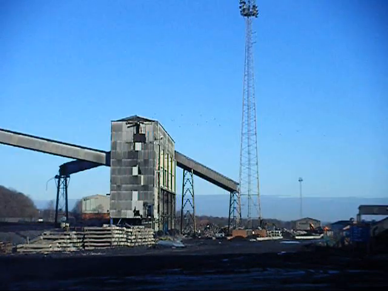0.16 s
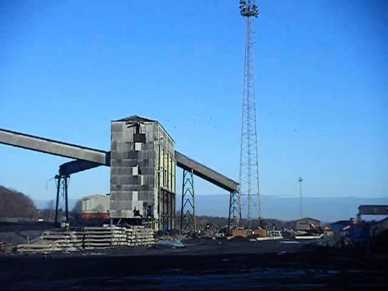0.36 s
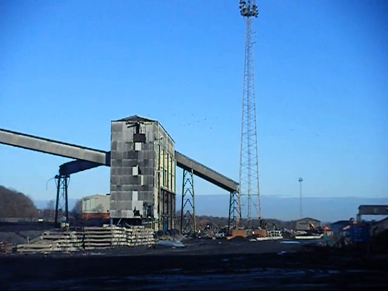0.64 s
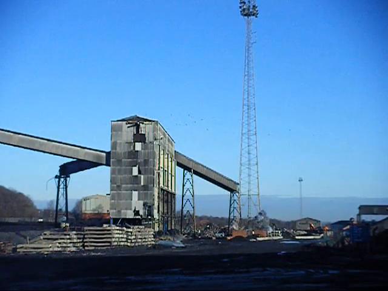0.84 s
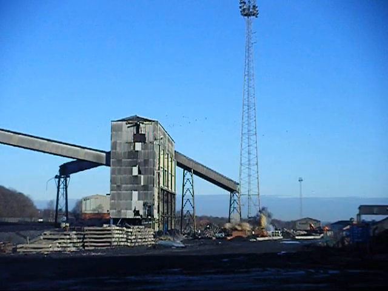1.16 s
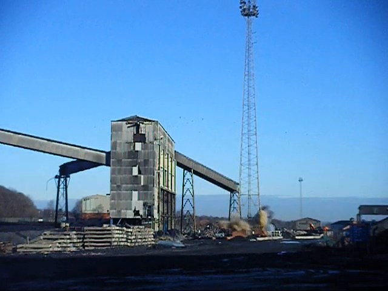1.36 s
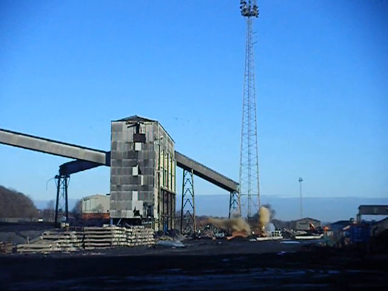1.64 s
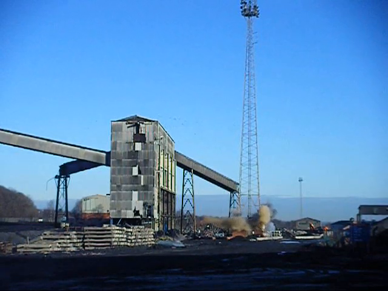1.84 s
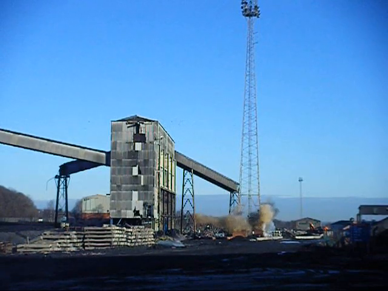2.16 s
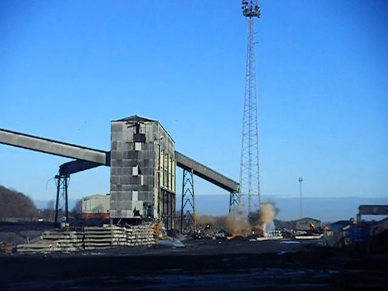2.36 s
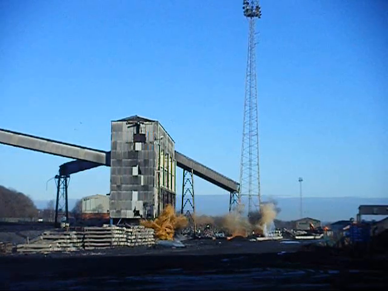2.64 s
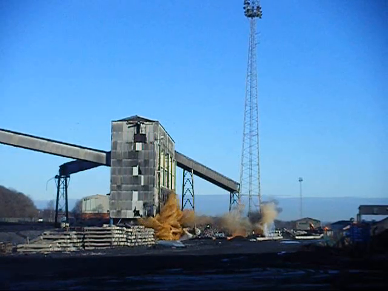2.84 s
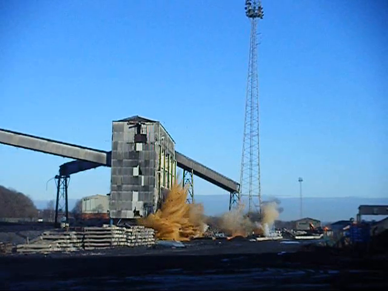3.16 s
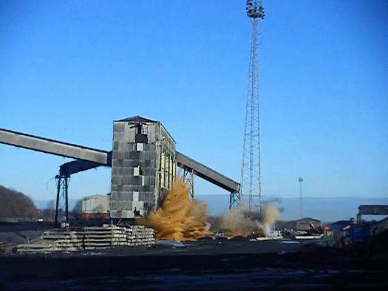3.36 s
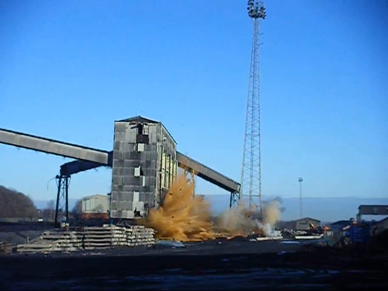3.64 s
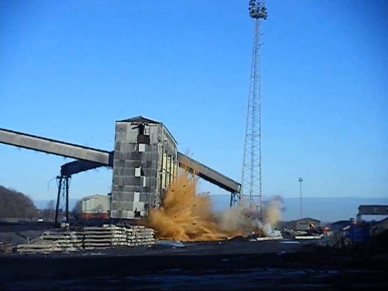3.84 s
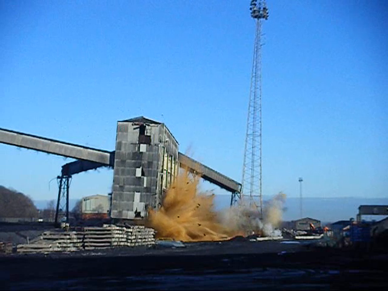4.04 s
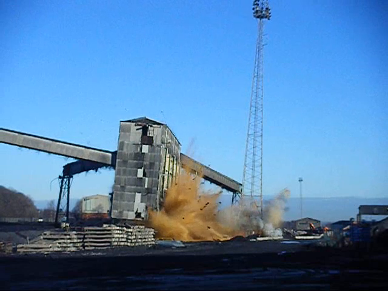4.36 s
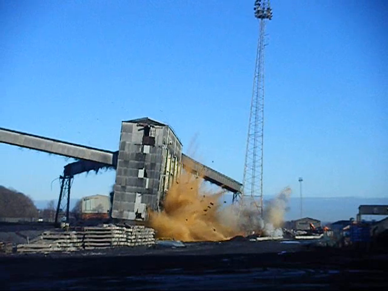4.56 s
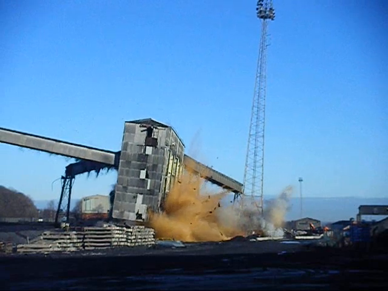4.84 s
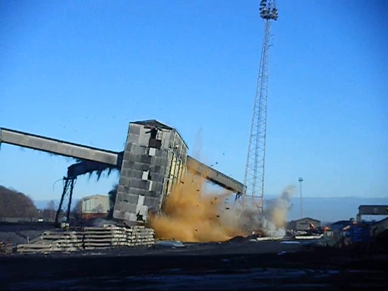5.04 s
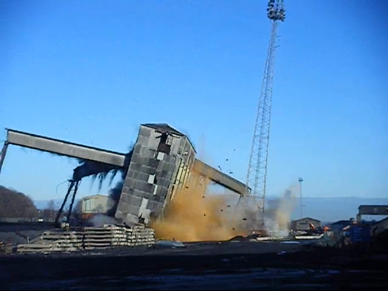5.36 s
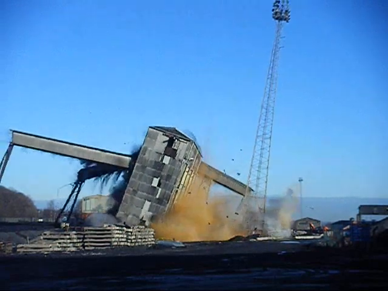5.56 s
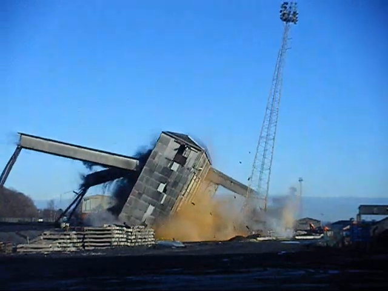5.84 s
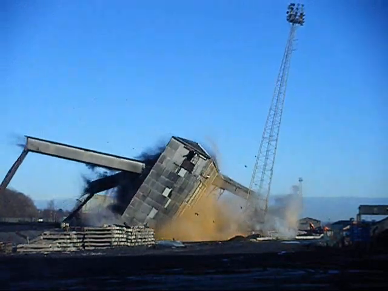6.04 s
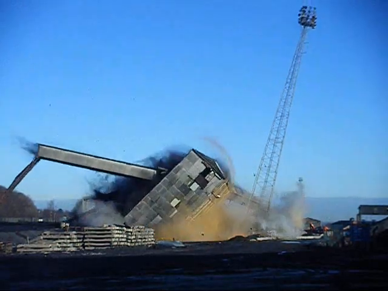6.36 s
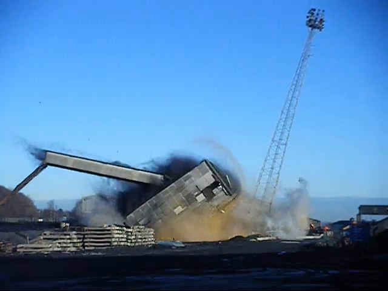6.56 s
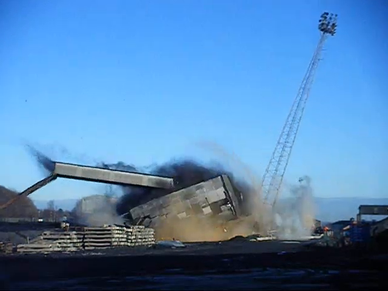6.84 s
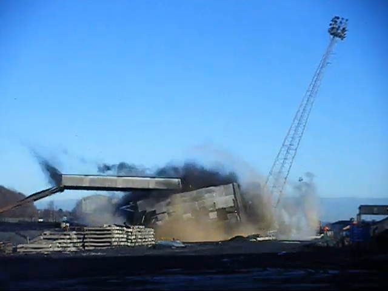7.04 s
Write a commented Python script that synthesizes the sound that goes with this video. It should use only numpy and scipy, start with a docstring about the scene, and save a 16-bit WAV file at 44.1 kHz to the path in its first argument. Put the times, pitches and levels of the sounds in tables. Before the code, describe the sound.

Distorted explosive blasts with dense rumbling echoes, followed by a heavy collapse of steel and rubble, thuds and clattering metal sheets outdoors.

```python
"""Demolition charges cut the legs of a steel tower on an open industrial site, heard in mono from one place.
Each blast is a pressure jump with a booming suction phase, a steep front and a short burst of tearing noise.
Echoes are dense random impacts coloured in four bands; the fall adds poured debris, thuds, ringing
girders, ticking splinters and clattering sheets over faint outdoor air.
The small camera microphone overloads on the blasts; coarse, stepped sampling adds a gritty treble."""
import sys
import numpy as np
from scipy import signal
from scipy.fft import rfft, irfft, next_fast_len
from scipy.io import wavfile

SR = 44100
rng = np.random.default_rng(int(sys.argv[2]) if len(sys.argv) > 2 else 0)


def dump(signal):
    """Clip the signal to [-1, 1] and save it as 16-bit WAV at the path in sys.argv[1]."""
    limited = np.clip(np.atleast_2d(signal).T, -1, 1)
    pcm = np.round(limited * 32767).astype(np.int16)
    wavfile.write(sys.argv[1], SR, pcm)


N = 317961
TIME, HZ = np.arange(N) / SR, np.fft.rfftfreq(N, 1 / SR)

# single blasts: start_s, level_db (before overload), boom_hz (nominal), crack_db (relative to level_db)
BLASTS = [ (.213, -10.5, 700, -2), (.2322, 7, 370, -31), (.2380, 15, 300, -15), (.3043, -5, 600, 2),
          (.3061, 18, 200, -10), (.4259, -9, 375, -28), (0.4291, 12, 380, -39), (.549, 10.5, 263, -29),
          (0.5912, 2, 500, -55), (0.5949, 13, 300, -37), (0.656, 2.5, 496, -13), (0.7109, 13, 220, -36),
          (0.7592, -12, 460, 17), (0.8051, 14.5, 208, -4), (2.0021, 14, 600, 0.5), (2.012, 23, 295, 7),
          (2.0133, 22.5, 118, -28), (2.0244, 14, 158, 6), (2.0638, 10, 135, -11), (2.0873, 3.5, 170, -4.5),
          (2.1334, 7, 111, -10), (2.1398, 3.5, 200, -13), (2.144, 0, 170, -24), (2.1674, -10, 250, -1),
          (2.1755, -2, 170, 1), (2.2016, -5, 150, -19), (2.717, -1.5, 350, -8.5),
          (3.5457, 25.5, 100.6, -19), (3.5654, 11.5, 150, -13.5), (3.5770, 3.5, 161, -9),
          (3.6581, -3, 200, -0.5), (3.6929, -10.5, 120, 1.5), (3.769, -6.5, 150, -17),
          (3.7768, -1.5, 170, -6.5), (3.8081, -3, 140, -10), (3.812, -4, 129, -17),
          (3.8927, -4.5, 300, -9.5), (3.952, -15.5, 150, 1.5), (4.0054, 3, 110, -4.5),
          (4.0322, -5.5, 130, -13), (4.128, -0.5, 141, -4), (4.336, -6, 100, -1), (4.4202, -3.5, 150, -5.5),
          (4.534, 3, 115, -11), (4.5636, -5, 149, -12)]
# dense echoes of the first volley, spectrum: frequency_hz, density_db (relative, per Hz)
FIRST_COLOUR = [(15, -77), (25, -45), (59, -36), (86, -14), (138, -13.5), (172, -6), (205, -6), (298, -1.5),
                (356, -0.5), (478, -5), (951, -7), (1490, -14), (2260, -19.5), (2750, -28.5), (3580, -62),
                (6050, -120)]
# the first roll; rows rumble, body, rush, edge:
# full_level_db, build_up_db (still to climb at the start), sink_db, tail_db_per_s
FIRST_BANDS = [(-30, -2, 7, 5), (-19, 3, 3, 5.5), (-17, 2.5, 9.5, 3.5), (-25, 0, 14, 8.5)]
# deeper echoes of the later volleys, spectrum: frequency_hz, density_db (relative, per Hz)
SECOND_COLOUR = [(12, -40), (20, -3.5), (76, 1.5), (164, 1.5), (268, -2), (350, -3.5), (431, -3), (487, -6),
                 (529, -3.5), (706, -2), (962, -1.5), (1860, -15), (2750, -24.5), (3580, -58), (6050, -120)]
# the later rolls; rows rumble, body, rush, edge:
# full_level_db (relative), build_up_db, scatter_level_db (relative, while a volley fires)
LATER_BANDS = [(-23.5, 13, -26), (-18, 31, -30.5), (-22, 21.5, -31), (-28.5, 21.5, -35)]
# scatter off nearby walls while a later volley fires: start_s, end_s, level_db (relative), fade_db_per_s
VOLLEYS = [(2.003, 2.191, 3, 24), (3.543, 4.58, 1, 6.5)]
# far echoes building to a roll after each later volley: start_s, end_s, build_up_s, level_db (relative)
ROLLS = [(2.22, 3.558, 0.85, -0.5), (4.493, 5.1, 0.72, -0.5)]
# snapping echoes of the shock fronts, spectrum: frequency_hz, density_db (relative, per Hz)
CRACKLE_COLOUR = [(100, -6), (500, -29), (1200, 0.5), (2500, -15.5), (4000, -17), (5400, -1)]
# heavy parts of the frame landing: start_s, level_db (about 22 ms in), pitch_hz (band centre)
THUDS = [(4.95, -21, 160), (5.051, -23, 254), (5.27, -20, 290), (5.391, -21, 109), (5.66, -18, 290),
         (5.849, -23, 84.6), (6.62, -28, 340), (6.869, -21, 320), (7.05, -22, 168)]
# rush of steel and rubble, spectrum: frequency_hz, density_db (relative, per Hz)
FALL_COLOUR = [(12, -53), (20, -39), (54, -2), (82, -1.5), (119, -1), (225, -1), (259, 0), (291, -3),
               (336, -1.5), (455, -4.5), (590, -7), (712, -5.5), (2150, -8.5), (3870, -20), (5500, -30),
               (7150, -58), (12100, -120)]
# the rush; rows rumble, body, rush, edge:
# level_db (relative, at the mean pour), follow_db_per_db (of pour), drift_db_per_s
FALL_BANDS = [(-31.5, 0.6, -1.5), (-23, .5, 0.5), (-23.5, 1, -0.5), (-27.5, 1.2, 2)]
# how hard the debris pours down: time_s, level_db (only its distance from the mean counts)
DEBRIS_POUR = [(5.02, -20), (5.29, -20), (5.6, -22), (5.76, -22), (5.89, -27), (6.05, -24.5), (6.25, -24),
               (6.41, -27.5), (6.52, -23), (6.7, -20.5), (6.82, -24.5), (6.92, -21.5), (7.21, -26)]
# brittle cladding breaking, spectrum: frequency_hz, density_db (relative, per Hz)
SPLINTER_COLOUR = [(200, -19), (1500, 6.5), (3000, 0), (4000, 5), (5400, -2)]
# steel sheets slamming down: start_s, level_db (relative), ring_down_t60_s
SLAMS = [(5.012, -24, 0.31), (5.27, -25, .1), (5.51, -25, 0.091), (5.898, -33, 0.033), (6.159, -24, 0.45),
         (6.409, -25, 0.1), (6.476, -18.5, 0.17), (6.668, -20.5, 0.2), (6.878, -18, 0.4), (6.94, -24, 0.11),
         (7.128, -19.5, 0.046)]
# clatter of the sheets, spectrum: frequency_hz, density_db (relative, per Hz)
SLAM_COLOUR = [(100, -28), (350, -26), (900, -10), (1900, 14), (3600, 11.5), (5400, 0.5)]
# outdoor background, spectrum: frequency_hz, density_db (relative, per Hz)
AIR_COLOUR = [(15, -37), (25, -20), (33, -6), (328, -2), (1950, -15), (2130, -9), (2330, -17.5),
              (5140, -17.5), (5500, -21), (7150, -40), (12100, -120)]
# borders between rumble, body, rush and edge: frequency_hz
BAND_EDGES_HZ = [150, 600, 1500]

FIRST_S, SECOND_S, FALL_S = .213, 2.003, 5.0  # first volley, later volleys, fall
LAST_CRACKS_S = 3.6  # cracks after this leave the deeper dips
FIRST_BUILD_S, FIRST_SINK_S, FIRST_SINK_LENGTH_S = 0.75, 1.125, 0.12  # the sink is centred on FIRST_SINK_S
SCATTER_RELEASE_DB_PER_S, ROLL_RELEASE_DB_PER_S = 195, 300
TEAR_RISE_MS, TEAR_MS, FRONT_MS = 0.19, 0.86, 0.19  # tearing noise rise and decay; steep front length
AIR_DB = -42
COARSE_HZ, FINE_HZ, CUT_HZ = 5512.5, 11025, 15620  # sampling in the blasts and elsewhere; band limit


def amp(db):
    """Decibels to gain."""
    return 10 ** (np.asarray(db) / 20)


def unit(x):
    """Scales to rms 1."""
    return x / np.sqrt(np.mean(x ** 2) + 1e-20)


def add(mix, s, sound):
    """Mixes a sound in at time s."""
    part = mix[round(s * SR):][:len(sound)]
    part += sound[:len(part)]


def filtered(x, gain):
    """Applies a gain given on the frequency axis HZ."""
    size = next_fast_len(N)
    gain_here = np.interp(np.fft.rfftfreq(size, 1 / SR), HZ, gain)
    return irfft(rfft(x, size) * gain_here, size)[:N]


def colour(points, top_hz):
    """Gain over frequency from a short spectrum, closed below 12 Hz and above top_hz."""
    hz, db = np.transpose(points)
    gain = amp(np.interp(np.log(HZ + 1), np.log(hz), db))
    return gain * (HZ < top_hz) * (HZ > 12)


def wander(hz):
    """Smooth random drift of rms 1, mostly slower than hz changes a second."""
    return unit(filtered(rng.standard_normal(N), np.exp(-(HZ / hz) ** 2)))


def fade_in(s, length):
    """Rises from 0 to 1, starting at s."""
    return np.clip((TIME - s) / length, 0, 1)


def build_up(start, length):
    """The share of a swell still to come: 1 at its start, easing to 0."""
    return (1 - fade_in(start, length)) ** 2


def gate(start, end, release_db_per_s):
    """Opens at start and dies away after end."""
    return fade_in(start, 0.0071) * amp(-release_db_per_s * np.maximum(TIME - end, 0))


def impacts(per_s, spread_db):
    """A random train of pushes; a positive spread makes many small and a few large, zero makes all equal."""
    size = amp(spread_db * np.minimum(rng.exponential(1, N), 4))
    sign = rng.choice([-1, 1], N)
    return unit(size * sign * (rng.random(N) < per_s / SR))


def roar(drive, spectrum, gains):
    """Colours a drive; its rumble, body, rush and edge are levelled and each follow their own gain."""
    lowpasses = [1 / (1 + (HZ / edge) ** 8) for edge in BAND_EDGES_HZ]
    below = [0 * HZ] + lowpasses + [1 + 0 * HZ]
    bands = [unit(filtered(drive, spectrum * (upper - lower))) for lower, upper in zip(below, below[1:])]
    return sum(band * gain for band, gain in zip(bands, gains))


def air():
    """The faint outdoor background: steady coloured noise."""
    return amp(AIR_DB) * unit(filtered(rng.standard_normal(N), colour(AIR_COLOUR, FINE_HZ / 2)))


def shock(level_db, boom_hz, crack_db, crack_ms=TEAR_MS, cycles=0.31, q=1.0,
          scatter_db=-24, scatter_ms=6.0, front_db=9.0, tear_db=0.0):
    """A pressure jump and its suction phase swing out as a boom; a steep front and tearing steel add a crack."""
    t = np.arange(SR // 16) / SR
    ms, u, w = 1000 * t, t * boom_hz / cycles, 2 * np.pi * boom_hz
    # a resonant high-pass lets the pulse swing out
    swing = signal.bilinear([1, 0, 0], [1, w / q, w * w], SR)
    boom = signal.lfilter(*swing, (u - 1) * np.exp(-u))
    tear_band = signal.butter(2, [900, 3200], "band", fs=SR)
    tear = signal.lfilter(*tear_band, rng.standard_normal(len(t)))
    front_band = signal.butter(2, [600, 2700], "band", fs=SR)
    front = signal.lfilter(*front_band, (ms / FRONT_MS - 1) * np.exp(-ms / FRONT_MS))
    # the ground scatters a little of the crack after it
    decay = np.exp(-ms / crack_ms) + amp(scatter_db) * np.exp(-ms / scatter_ms)
    tearing = unit(tear) * decay * np.minimum(ms / TEAR_RISE_MS, 1)
    crack = amp(front_db) * front + amp(tear_db) * tearing
    return amp(level_db) * (boom + amp(crack_db) * crack)


def charges():
    """All the shock waves as they reach the camera."""
    out = np.zeros(N)
    for s, *blast in BLASTS:
        add(out, s, shock(*blast))
    return out


def dips(length=0.023, fall=0.016, recovery=0.0021, from_db=-15, range_db=7, early_db=2.5, late_db=16):
    """Echoes and air dip briefly behind the loudest cracks, most deeply in the last volley; times in s."""
    db, t = np.zeros(N), np.arange(0, length, 1 / SR)
    shape = np.minimum(np.minimum(t / fall, 1), (length - t) / recovery)
    for s, level_db, _, crack_db in BLASTS:
        depth_db = late_db if s > LAST_CRACKS_S else early_db
        loudness = np.clip((level_db + crack_db - from_db) / range_db, 0, 1)
        add(db, s, depth_db * loudness * shape)
    return amp(-db)


def first_roll(flutter_db=0.47):
    """The first volley comes back from all over the site as a dense roll, then sinks; its treble dies first."""
    drive = impacts(per_s=8000, spread_db=1.0) * amp(flutter_db * wander(hz=28.7))
    span = fade_in(FIRST_S, .001) - fade_in(SECOND_S, .01)
    to_come = build_up(FIRST_S, FIRST_BUILD_S)
    late_s = TIME - FIRST_SINK_S
    sunk = .5 + .5 * np.tanh(late_s / FIRST_SINK_LENGTH_S)
    gains = [amp(db - build_db * to_come - sink_db * sunk - tail_db * np.maximum(late_s, 0))
             for db, build_db, sink_db, tail_db in FIRST_BANDS]
    return span * roar(drive, colour(FIRST_COLOUR, COARSE_HZ / 2), gains)


def hum(hz=178, width_hz=32, level_db=-24, hold_s=0.54, release_db_per_s=50):
    """The first blasts leave a low, hollow resonance in the roll: noise in a narrow band."""
    ring = filtered(rng.standard_normal(N), 1 / (1 + ((HZ - hz) / width_hz) ** 4))
    return unit(ring) * amp(level_db) * gate(FIRST_S, FIRST_S + hold_s, release_db_per_s)


def firing():
    """Strength of the nearby scatter while the later volleys fire."""
    return sum(gate(start, end, SCATTER_RELEASE_DB_PER_S) * amp(db - fade * np.maximum(TIME - start, 0))
               for start, end, db, fade in VOLLEYS)


def rolling(build_db):
    """Strength of the far echoes, which climb by build_db after each later volley."""
    return sum(gate(start, end, ROLL_RELEASE_DB_PER_S) * amp(db - build_db * build_up(start, build))
               for start, end, build, db in ROLLS)


def second_roll(level_db=0.5, flutter_db=1.5, sputter_db=4.0):
    """Deeper echoes of the later volleys: near scatter, then a roll; they sputter while the last volley fires."""
    last_volley = np.interp(TIME, [3.5, 3.6, 4.55, 4.75], [0, 1, 1, 0])
    unrest_db = flutter_db * wander(hz=28) + sputter_db * last_volley * wander(hz=90)
    drive = impacts(per_s=5000, spread_db=1.5) * amp(unrest_db)
    span = fade_in(SECOND_S, .01) - fade_in(FALL_S, .04)
    near = firing()
    # near and far echoes add in power
    gains = [np.hypot(amp(db) * rolling(build_db), amp(near_db) * near)
             for db, build_db, near_db in LATER_BANDS]
    return amp(level_db) * span * roar(drive, colour(SECOND_COLOUR, COARSE_HZ / 2), gains)


def crackle(per_s=450, spread_db=3.0, volley_db=-29.5, roll_db=-36, build_db=35):
    """Countless faint echoes of the shock fronts snap between the later blasts and at the height of the roll."""
    snaps = filtered(impacts(per_s, spread_db), colour(CRACKLE_COLOUR, FINE_HZ / 2))
    return unit(snaps) * (amp(volley_db) * firing() + amp(roll_db) * rolling(build_db))


def ricochets(level_db=-20, spread_db=7.0, boom_hz=220, crack_db=-3, crack_ms=0.74, fade_db=-5, count=45):
    """Small, sharp echoes of the last volley pop between its blasts: weak shocks at scattered pitches."""
    out = np.zeros(N)
    for k, (place, size, octave) in enumerate(rng.uniform(-1.2, 1, (count, 3))):
        progress = (k + 1 + place) / count
        pop_db = level_db + spread_db * size + fade_db * progress
        add(out, 3.61 + progress, shock(pop_db, boom_hz * 2 ** octave, crack_db, crack_ms))
    return out


def thuds(attack=0.011, t60=0.5, width=1.4):
    """Each heavy landing gives a short, low rumble: band noise with a soft attack; times in s."""
    t, out = np.arange(SR // 2) / SR, np.zeros(N)
    for s, db, hz in THUDS:
        band = signal.butter(2, [hz / width, hz * width], "band", fs=SR, output="sos")
        rumble = signal.sosfilt(band, rng.standard_normal(len(t)))
        envelope = np.minimum(t / attack, 1) * amp(db - 60 * (t - 2 * attack) / t60)
        add(out, s, unit(rumble) * envelope)
    return out


def pour():
    """How far the pour of debris is above its mean, in dB."""
    s, db = np.transpose(DEBRIS_POUR)
    return np.interp(TIME, s, db - db.mean())


def collapse(level_db=-1, flutter_db=0.72):
    """Thousands of pieces of steel and rubble land in one rush of random impacts."""
    drive = impacts(per_s=5500, spread_db=0.0) * amp(flutter_db * wander(hz=25.5))
    span = fade_in(FALL_S - .005, .025)
    gains = [amp(db + follow * pour() + drift * (TIME - FALL_S)) for db, follow, drift in FALL_BANDS]
    return amp(level_db) * span * roar(drive, colour(FALL_COLOUR, FINE_HZ / 2), gains)


def girders(level_db=-31.5, t60=0.11, low_hz=230, high_hz=3800, tilt_db=-1.0, count=28):
    """Beams and panels knock together in the fall, each ringing briefly at its own pitch; tilt per octave."""
    t, out = np.arange(SR // 4) / SR, np.zeros(N)
    start = round(FALL_S * SR)
    for hz in np.geomspace(low_hz, high_hz, count) * rng.uniform(.96, 1.04, count):
        # about nine knocks a second on each piece
        knocks = rng.standard_normal(N - start) * (rng.random(N - start) < 9 / SR)
        ring = np.sin(2 * np.pi * hz * t) * amp(tilt_db * np.log2(hz / low_hz) - 60 * t / t60)
        out[start:] += signal.oaconvolve(knocks, ring)[:N - start]
    out[start:] = unit(out[start:])
    return out * amp(level_db + pour())


def splinters(per_s=900, spread_db=-1.5, clump_db=3.0, peak_s=6.66, peak_db=-23,
              rise_db_per_s=48, fall_db_per_s=14, bed_db=-45):
    """Brittle cladding breaks in clumps of bright ticks, loudest as the tower's side meets the ground."""
    clumps = impacts(per_s, spread_db) * amp(clump_db * wander(hz=45))
    ticks = filtered(clumps, colour(SPLINTER_COLOUR, FINE_HZ / 2))
    swell_db = peak_db - np.maximum(rise_db_per_s * (peak_s - TIME), fall_db_per_s * (TIME - peak_s))
    return unit(ticks) * (amp(swell_db) + amp(bed_db)) * fade_in(FALL_S, .04)


def sheets(level_db=-1, hold=0.013, attack=0.0041):
    """Each large sheet lands, clatters brightly while it settles, and dies away; times in s."""
    t, envelope = np.arange(SR // 2) / SR, np.zeros(N)
    for s, db, t60 in SLAMS:
        decay = amp(db - 60 * np.maximum(t - hold, 0) / t60)
        add(envelope, s, decay * np.minimum(t / attack, 1))
    clatter = filtered(impacts(per_s=2400, spread_db=3.0), colour(SLAM_COLOUR, FINE_HZ / 2))
    return amp(level_db) * envelope * unit(clatter)


def scene():
    """Blasts, their echoes and the fall, heard from one place."""
    echoes = first_roll() + hum() + second_roll() + ricochets() + crackle()
    fall = collapse() + thuds() + girders() + splinters() + sheets()
    return (charges() + dips() * (echoes + air()) + fall)[None]


def held(x, rate):
    """Holds each sample until the next: the steps mirror the sound into the treble."""
    return x[:, np.arange(N) - np.arange(N) % round(SR / rate)]


def record(dry, ceiling=.94):
    """The camera: hard overload, stepped sampling (coarser from first blast to fall), then the band limit."""
    clipped = np.clip(dry, -ceiling, ceiling)
    coarse = fade_in(FIRST_S - .002, .002) - fade_in(FALL_S - .01, .04)
    stepped = coarse * held(clipped, COARSE_HZ) + (1 - coarse) * held(clipped, FINE_HZ)
    band_limit = signal.firwin(511, CUT_HZ, window=("kaiser", 7), fs=SR)
    return signal.oaconvolve(stepped, band_limit[None], "same")


dry = scene()
out = record(dry)
dump(out)
```